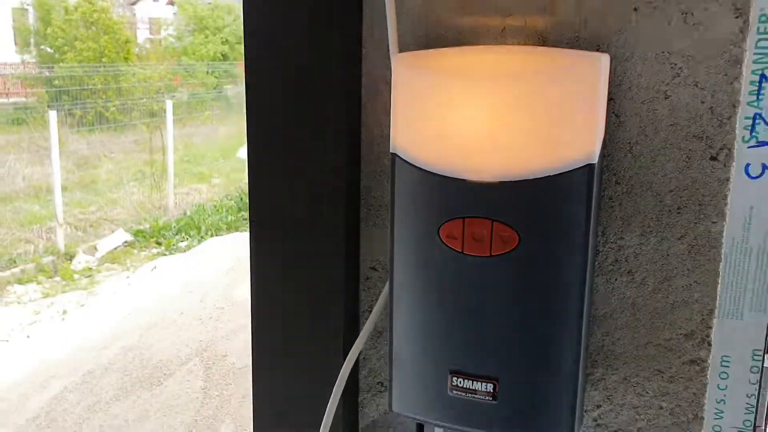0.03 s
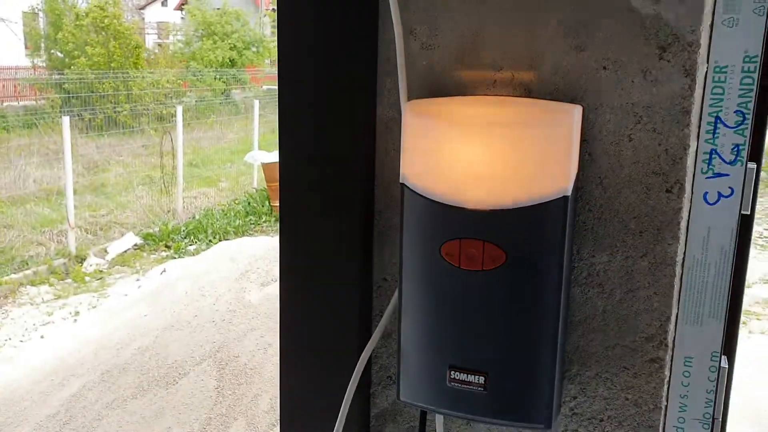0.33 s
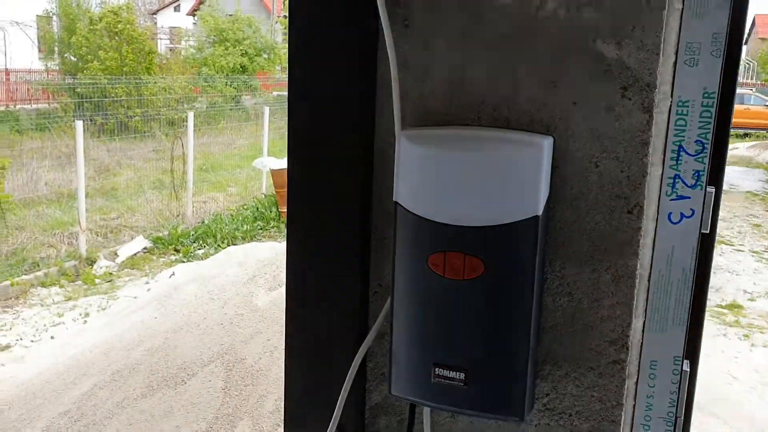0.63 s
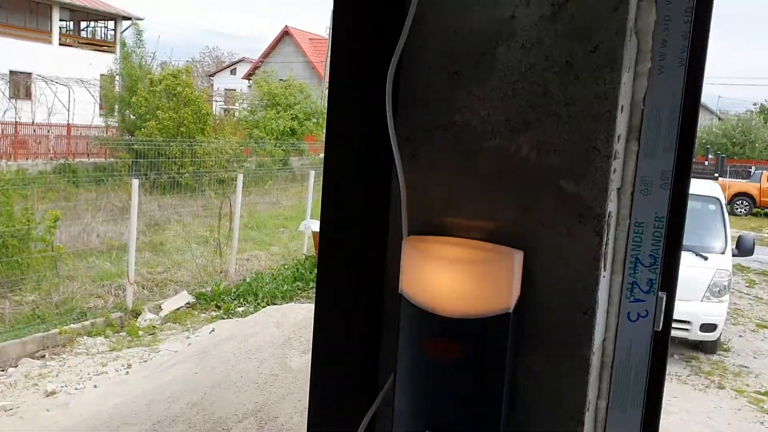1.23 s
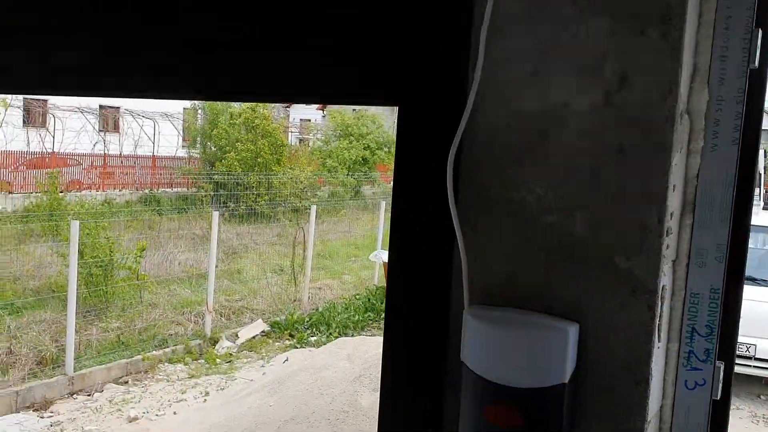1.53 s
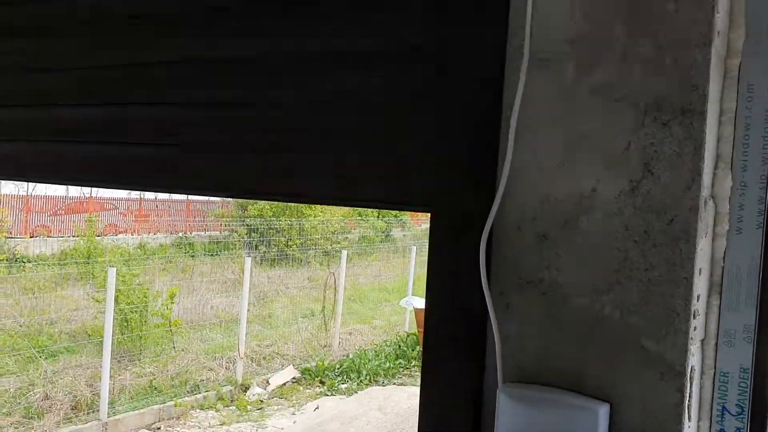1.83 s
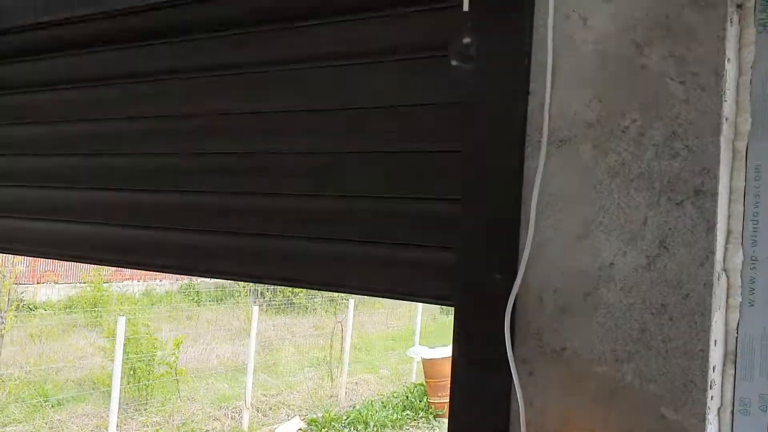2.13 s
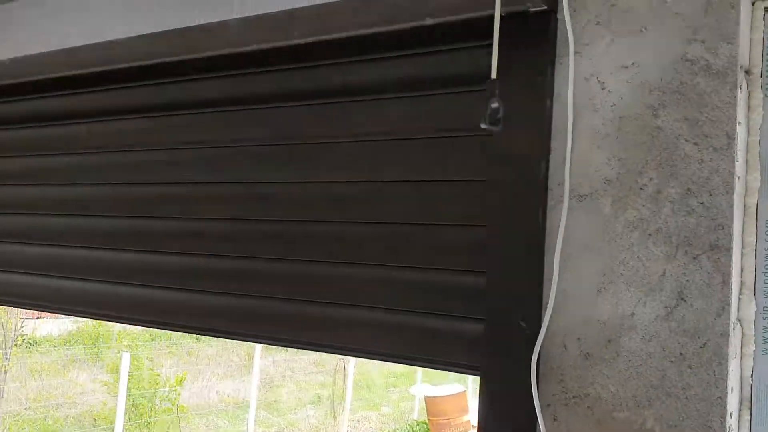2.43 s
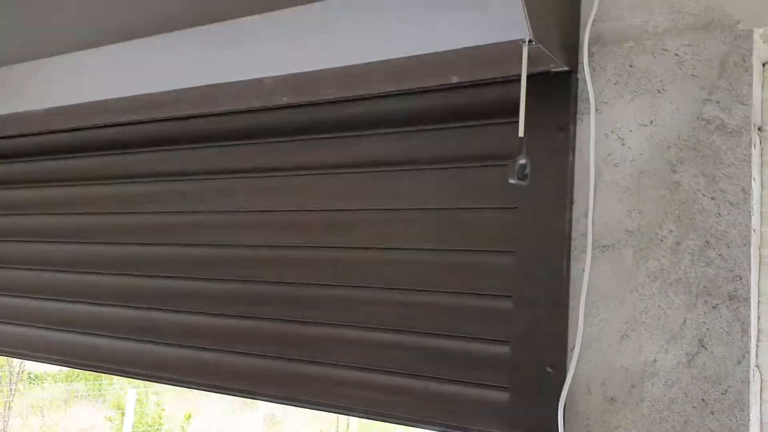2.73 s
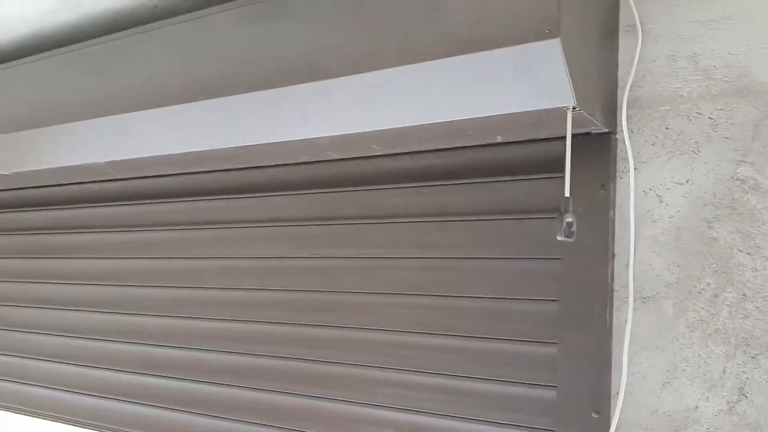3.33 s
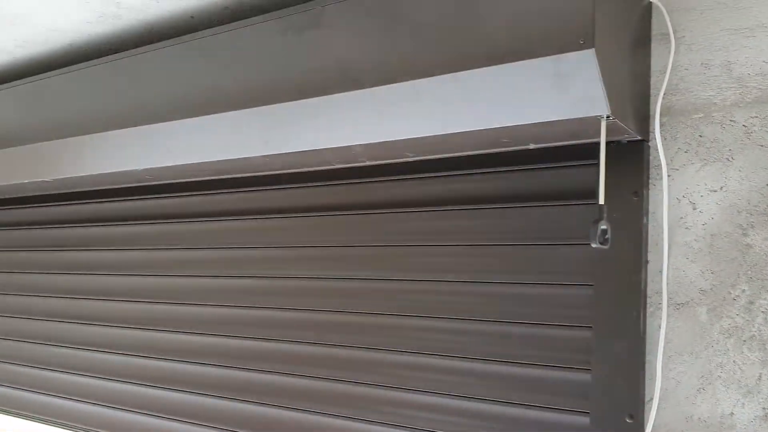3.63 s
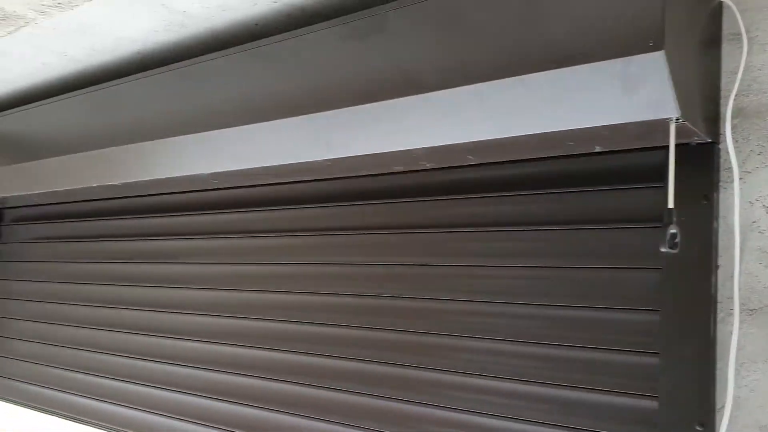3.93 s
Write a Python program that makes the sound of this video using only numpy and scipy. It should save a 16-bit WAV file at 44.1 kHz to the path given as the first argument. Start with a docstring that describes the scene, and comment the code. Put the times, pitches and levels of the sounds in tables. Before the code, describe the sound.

Roller door closing, with a throbbing motor whine, scraping slats and clusters of knocks.

```python
"""Roller door closing in a concrete garage.

Heard on a phone's stereo microphones, just inside the motorised door and beside its rail.
The mains motor hums; its rotor slips behind the mains, so its whine throbs, slower as the load eases.
The slats rumble and scrape in the guide rails and knock as they leave the roll; bare walls add a tail.
A faint hiss lies on top, a puff of air hits the microphones, and the door drifts from left to right."""
import sys
import numpy as np
from scipy import signal
from scipy.fft import rfft, irfft
from scipy.io import wavfile
from scipy.ndimage import map_coordinates

SR = 44100
rng = np.random.default_rng(int(sys.argv[2]) if len(sys.argv) > 2 else 0)


def dump_mix(stems):
    """Bounce the given channels to the path in sys.argv[1] as a 16-bit WAV at rate SR."""
    frames = np.atleast_2d(stems).T  # one column per channel
    limited = np.clip(frames, -1, 1)  # hard clip at full scale
    pcm = np.round(limited * 32767).astype(np.int16)
    wavfile.write(sys.argv[1], SR, pcm)


N = 176400
TIME = np.arange(N) / SR
ROOM_T60_S, ROOM_DB = .7, -11  # the garage's tail on every blow


def undb(db):
    """Decibels to gain."""
    return 10 ** (np.asarray(db) / 20)


def curve(rows, column=1):
    """One column of a timed table at every sample."""
    rows = np.array(rows)
    return np.interp(TIME, rows[:, 0], rows[:, column])


def colour(x, spectrum):
    """Filter by (Hz, dB) points, rolling off beyond both ends."""
    hz, db = np.array(spectrum).T
    f = np.maximum(np.fft.rfftfreq(N, 1 / SR), 1)
    gain = undb(np.interp(np.log(f), np.log(hz), db))
    skirts = np.minimum(f / hz[0], 1) ** 2 * np.minimum(hz[-1] / f, 1) ** 2
    return irfft(rfft(x) * gain * skirts, N)


def wander(rate_hz):
    """A random drift with a spread near 1."""
    knots = rng.standard_normal(1024)
    return np.interp(TIME * rate_hz, np.arange(len(knots)), knots)


# Stereo width of the garage. Each row: frequency in Hz, side against mid in dB.
ROOM_WIDTH = [(30, 3.5), (70, -12.5), (130, -6), (260, -11.5), (500, -4), (1000, -1), (16000, 0.5)]
def room_noise(spectrum, grain_db=0, grain_hz=100):
    """Coloured noise spread between the microphones; grain makes it uneven, like dense contacts."""
    mid, side = rng.standard_normal((2, N)) * undb(grain_db * wander(grain_hz))
    mid = colour(mid, spectrum)
    side = colour(colour(side, spectrum), ROOM_WIDTH)
    return np.array([mid + side, mid - side]) / np.std(mid)


def blows(rows, rise_s, t60_s, column=1):
    """Envelope of a series of blows: a rise, a fall and the tail of the room."""
    since_peak = np.maximum(TIME - rise_s, 0)
    direct = undb(-60 * since_peak / t60_s)
    tail = undb(ROOM_DB - 60 * since_peak / ROOM_T60_S)
    blow_power = np.minimum(TIME / rise_s, 1) ** 2 * (direct ** 2 + tail ** 2)
    power = np.zeros(N)
    for row in rows:
        start = int(row[0] * SR)
        power[start:] += undb(row[column]) ** 2 * blow_power[:N - start]
    return np.sqrt(power)


def tone(turns, db):
    """A sine from its phase in turns and its RMS level."""
    return np.sqrt(2) * undb(db) * np.sin(2 * np.pi * turns)


# The rotor's lag behind the mains. Each row: time in seconds, slip in Hz.
ROTOR_SLIP = [(0, 1.107), (.5, 1.054), (1.3, 1.032), (2, .931), (2.9, .896), (3.5, .769), (4, .645)]
# Mains hum. Each row: mains multiple, level in dB.
HUM_LINES = [(2, -44.5), (4, -37.5), (6, -48.5), (8, -45.5)]
# Stator and rotor whine. Each row: mains multiple, slip multiple, relative level in dB.
WHINE_LINES = [(10, 0, 0.6), (10, -10, 4), (9, 1, -8), (9, -9, -4.5), (11, -1, -8)]
# The whine from beside the rail. Each row: time in seconds, level in dB, flutter boost in dB.
WHINE_LEVEL = [(0, -33.5, 2.5), (.1, -32.5, 5), (.25, -38, 5.5), (.47, -41.5, 12), (.8, -53, 8),
               (1.5, -52.5, -4), (2.1, -34, -11), (2.6, -36, 2.5), (2.85, -32, -5.5), (3.45, -32, -1),
               (4, -32.5, -0.5)]
def motor():
    """Mains hum, and a whine whose stator and rotor lines beat; an uneven shaft adds flutter."""
    mains_hz, whine_multiple, jitter_turns = 50, 10, .025
    mains_turns = mains_hz * TIME
    slip_turns = np.cumsum(curve(ROTOR_SLIP)) / SR
    whine_db = curve(WHINE_LEVEL) + .7 * wander(6.2)
    flutter_db = curve(WHINE_LEVEL, column=2)
    hum = sum(tone(multiple * mains_turns, db + 2.2 * wander(10)) for multiple, db in HUM_LINES)
    whine = 0
    for multiple, slip_multiple, db in WHINE_LINES:
        # Once-a-turn flutter sets the sidebands' level and roughens every line's phase.
        sideband_db = (flutter_db + 1.4 * wander(10)) * (multiple != whine_multiple)
        jitter = jitter_turns * undb(flutter_db) * wander(mains_hz)
        turns = multiple * mains_turns + slip_multiple * slip_turns + jitter
        whine += tone(turns, whine_db + db + sideband_db)
    return hum + whine


# Four layers of slat noise at the rail, low to high. Each row: time in seconds, level in dB.
DRONE_LEVEL = [(0, -46.5), (.6, -37), (2.9, -39), (4, -43)]
RUMBLE_LEVEL = [(0, -38), (.55, -31.5), (1.12, -30.5), (1.3, -24), (1.45, -31.5), (1.62, -31), (1.8, -24),
                (2.05, -31), (2.38, -37), (2.52, -28.5), (2.8, -32.5), (4, -39.5)]
SCRAPE_LEVEL = [(0, -43.5), (.5, -39), (1.0, -45), (1.35, -40.5), (1.55, -42.5), (1.85, -39.5),
                (2.35, -42.5), (2.6, -39), (4, -39.5)]
RASP_LEVEL = [(0, -50.5), (.5, -50.5), (1.05, -58), (1.3, -53), (1.5, -61.5), (1.9, -61), (2.41, -68),
              (2.45, -60), (4, -67)]
# Their spectra. Each row: frequency in Hz, relative level in dB.
DRONE_SPECTRUM = [(20, -16.5), (35, -13), (66, -1.5), (85, -4), (160, -8.5), (260, -33.5)]
RUMBLE_SPECTRUM = [(120, -35), (170, -7.5), (250, -2.5), (295, -7), (345, -13), (440, -8), (800, -22.5),
                   (1500, -62.5)]
SCRAPE_SPECTRUM = [(250, -29.5), (450, 6), (750, -3), (1200, -8.5), (1700, -17), (4000, -58.5)]
RASP_SPECTRUM = [(600, -19), (1200, 5.5), (3100, -4.5), (4000, -10.5), (7500, -38)]
def rolling_slats():
    """The moving slats drone and rumble, and scrape and rasp in their rails."""
    drone = undb(curve(DRONE_LEVEL)) * room_noise(DRONE_SPECTRUM, grain_db=2.5, grain_hz=13)
    rumble = undb(curve(RUMBLE_LEVEL)) * room_noise(RUMBLE_SPECTRUM, grain_db=2, grain_hz=60)
    scrape = undb(curve(SCRAPE_LEVEL)) * room_noise(SCRAPE_SPECTRUM, grain_db=3, grain_hz=78)
    rasp = undb(curve(RASP_LEVEL)) * room_noise(RASP_SPECTRUM, grain_db=2, grain_hz=260)
    return drone + rumble + scrape + rasp


# Air in the background. Each row: time in seconds, level in dB.
AIR_LEVEL = [(1.04, -70), (1.17, -88), (1.25, -73), (1.42, -84), (1.54, -68)]
# Its spectrum. Each row: frequency in Hz, relative level in dB.
AIR_SPECTRUM = [(1500, 7), (3700, -5), (4700, 4.5), (5800, -10), (7200, -30.5), (12500, -16.5),
                (15500, -24.5)]
def air():
    """A faint airy noise that dips twice."""
    return undb(curve(AIR_LEVEL)) * room_noise(AIR_SPECTRUM)


# Hiss above the door's noise. Each row: time in seconds, level in dB.
HISS_LEVEL = [(0, -70), (.16, -59), (.27, -65), (.65, -70), (1.18, -73), (1.22, -66), (1.3, -68.5),
              (1.37, -79.5), (1.46, -78), (1.54, -65.5), (2.04, -64), (2.2, -88.5), (4, -90)]
# Its spectrum. Each row: frequency in Hz, relative level in dB.
HISS_SPECTRUM = [(3500, -9), (6000, 0.5), (6900, -9.5), (7500, -20), (11000, 2), (13000, 4), (15500, -1)]
def hiss():
    """A high, grainy hiss that comes and goes."""
    return undb(curve(HISS_LEVEL)) * room_noise(HISS_SPECTRUM, grain_db=1.5, grain_hz=97)


# Slats leaving the roll. Each row: start in seconds, thud level in dB, clack level in dB.
KNOCKS = [(0.123, -42, -36), (0.328, -43.5, -34), (.442, -41, -30), (0.483, -34, -37), (.951, -44, -38),
          (1.094, -28, -33), (1.203, -16, -33), (1.226, -26, -30.5), (1.293, -17.5, -36),
          (1.325, -19.5, -37), (1.353, -21, -44), (1.701, -21, -25), (1.745, -24.5, -31),
          (1.768, -21.5, -37), (1.82, -27, -34), (1.887, -25, -48), (2.432, -26, -39), (2.471, -25.5, -38),
          (2.546, -25, -39), (2.681, -25, -48), (2.785, -44, -40), (2.849, -37, -41)]
# The door's ring. Each row: frequency in Hz, relative level in dB, time to fall 60 dB in seconds.
SLAT_MODES = [(202, -10, .25), (246, 1, .14), (305, -9, .14), (440, 3, .12), (488, -2, .1), (673, -12, .15),
              (766, -10, .2)]
# The two noises in a knock. Each row: frequency in Hz, relative level in dB.
THUD_SPECTRUM = [(50, -17), (170, -15.5), (250, 2.5), (340, -17), (440, -5), (560, -16), (770, -21.5),
                 (1100, -26.5), (2500, -67)]
CLACK_SPECTRUM = [(250, -20), (450, 13), (1350, -0.5), (2000, -6.5), (3100, -14.5), (3900, -27.5),
                  (7500, -53.5)]
def slat_knocks():
    """A slat drops against the next: the hard clack rings the high modes, the thud the low ones."""
    rise_s, ring_db, split_hz = .008, 1, 350
    thud_hits, clack_hits, ring = np.zeros((3, N))
    for start_s, thud_db, clack_db in KNOCKS:
        thud_hits[int(start_s * SR)] += undb(thud_db + ring_db)
        clack_hits[int(start_s * SR)] += undb(clack_db + ring_db)
    attack = np.minimum(TIME / rise_s, 1)
    for hz, db, t60_s in SLAT_MODES:
        mode = attack * undb(db - 60 * TIME / t60_s) * np.sin(2 * np.pi * hz * TIME)
        hits = clack_hits if hz > split_hz else thud_hits
        ring += signal.fftconvolve(hits, mode)[:N]
    thud = blows(KNOCKS, rise_s, t60_s=.14) * room_noise(THUD_SPECTRUM)
    clack_noise = room_noise(CLACK_SPECTRUM, grain_db=2, grain_hz=160)
    clack = blows(KNOCKS, rise_s=.002, t60_s=.11, column=2) * clack_noise
    return ring + thud + clack


# Ticks in the first second. Each row: start in seconds, level in dB.
TICKS = [(.378, -58), (.879, -62.5), (.952, -66)]
def ticks():
    """Light ticks, as bright as the hiss."""
    return blows(TICKS, rise_s=.001, t60_s=.07) * room_noise(HISS_SPECTRUM)


def draught():
    """One puff of air buffets each microphone port on its own, the left one harder."""
    start_s, db = 1.19, -25.5
    left = room_noise(DRONE_SPECTRUM)[0]
    right = room_noise(DRONE_SPECTRUM)[1] / 2
    return blows([(start_s, db)], rise_s=.061, t60_s=ROOM_T60_S) * np.array([left, right])


# Brushes along the rail. Each row: start in seconds, level in dB.
BRUSHES = [(2.422, -60.5), (3.54, -66)]
# Their spectrum. Each row: frequency in Hz, relative level in dB.
BRUSH_SPECTRUM = [(3200, 2.5), (6200, 0.5), (7700, -24), (13000, -5)]
def rail_brushes():
    """Slats brush the rail in short, gritty swishes."""
    return blows(BRUSHES, rise_s=.025, t60_s=.25) * room_noise(BRUSH_SPECTRUM, grain_db=7)


# Clinks on the rail beside the microphones. Each row: start in seconds, level in dB.
CLINKS = [(2.922, -38), (3.136, -39.5)]
# The rail's ring. Each row: frequency in Hz, relative level in dB.
RAIL_MODES = [(1290, -0.5), (1730, -10), (2850, -16)]
def rail_clinks():
    """A slat edge rattles on the rail, which rings briefly in three broad modes."""
    ring = 0
    for hz, db in RAIL_MODES:
        peak = [(hz / 2, -60), (hz / 1.15, -14), (hz, 0), (hz * 1.15, -14), (hz * 2, -60)]
        ring += undb(db) * room_noise(peak)
    return blows(CLINKS, rise_s=.0021, t60_s=.16) * ring


# The door's direction. Each row: time in seconds, lead of the left microphone in milliseconds.
LEFT_LEAD = [(0, 0.19), (1.0, 0.26), (1.7, -0.029), (4, -0.32)]
def turn_phone(door):
    """As the phone turns, the door moves left to right: the nearer microphone is earlier and louder."""
    pan_db_per_ms = 9
    lead_ms, channels = curve(LEFT_LEAD), []
    for channel, side in zip(door, (.5, -.5)):
        position = np.arange(N) + side * lead_ms * SR / 1000
        shifted = map_coordinates(channel, [position], mode="mirror")
        channels.append(shifted * undb(side * pan_db_per_ms * lead_ms))
    return np.array(channels)


def scene():
    """Everything that reaches the microphones just inside the door."""
    door = turn_phone(motor() + rolling_slats() + slat_knocks())
    return door + rail_clinks() + hiss() + ticks() + rail_brushes() + air() + draught()


def record(dry):
    """The phone cuts the top treble steeply."""
    top_hz = 15700
    return signal.sosfilt(signal.ellip(10, .2, 80, top_hz, fs=SR, output="sos"), dry)


dry = scene()
out = record(dry)
dump_mix(out)
```